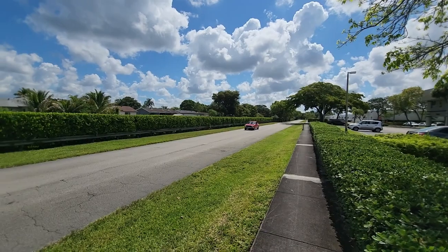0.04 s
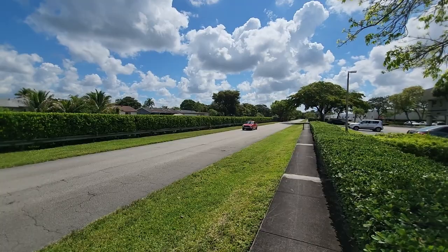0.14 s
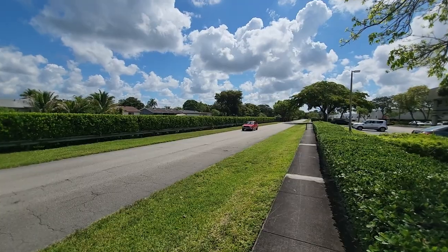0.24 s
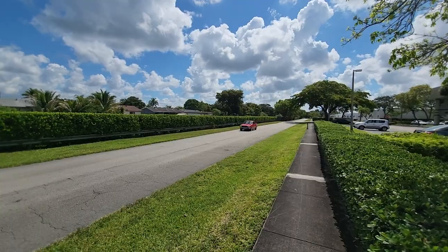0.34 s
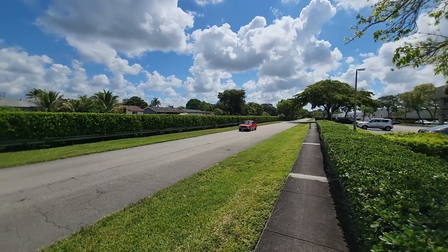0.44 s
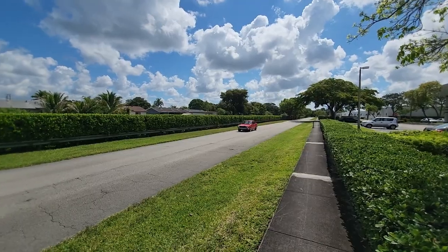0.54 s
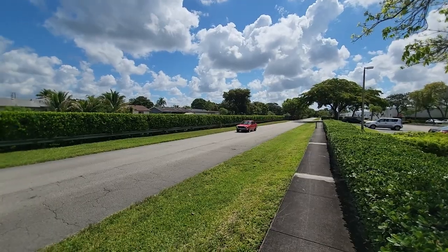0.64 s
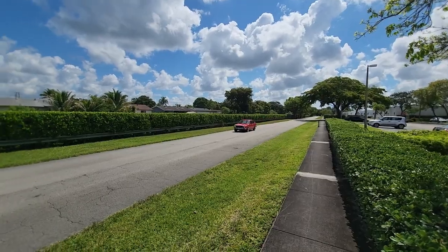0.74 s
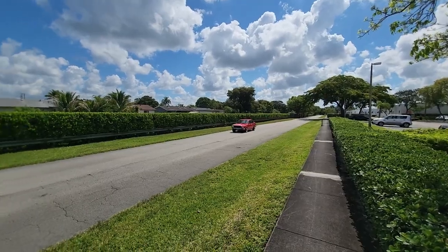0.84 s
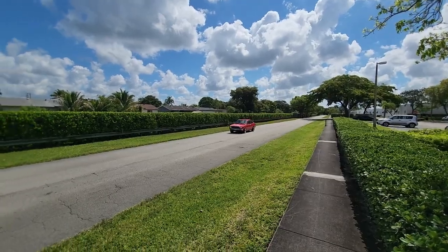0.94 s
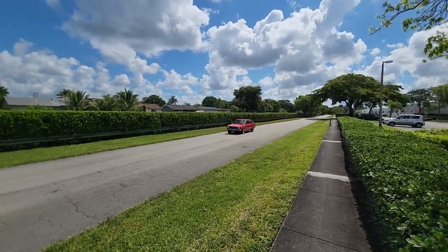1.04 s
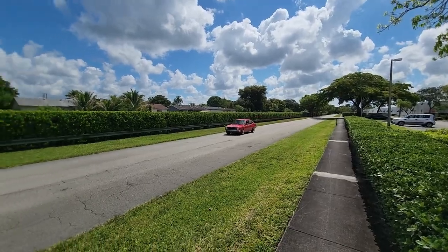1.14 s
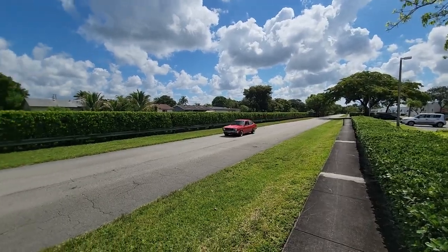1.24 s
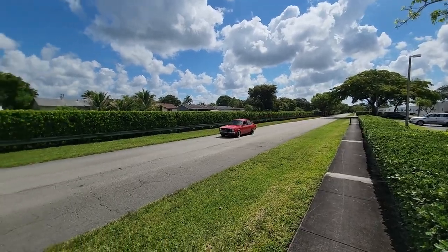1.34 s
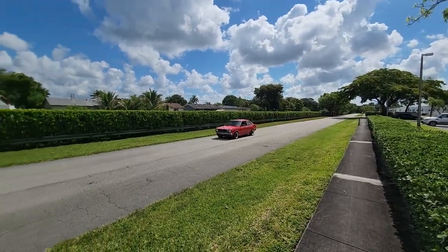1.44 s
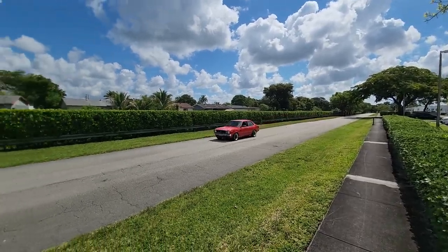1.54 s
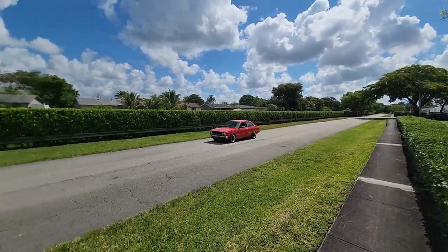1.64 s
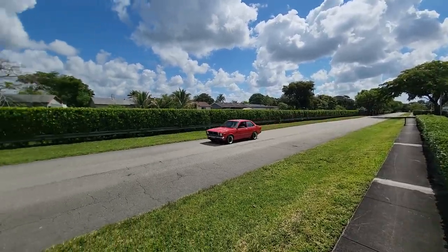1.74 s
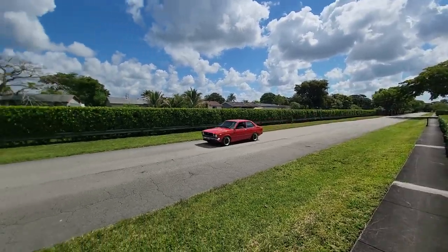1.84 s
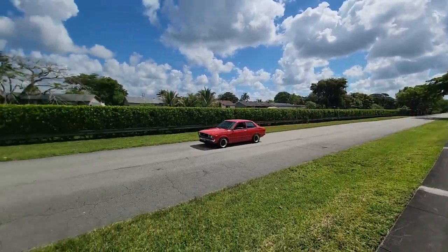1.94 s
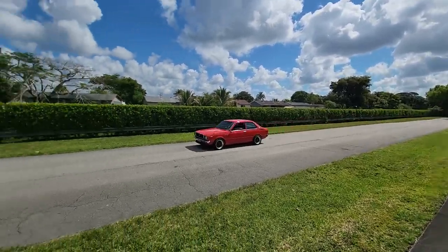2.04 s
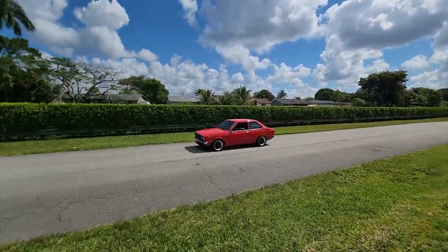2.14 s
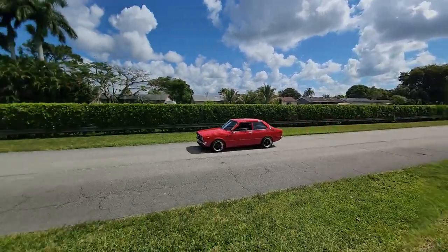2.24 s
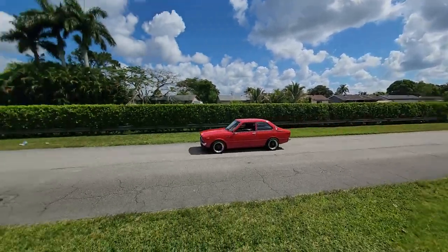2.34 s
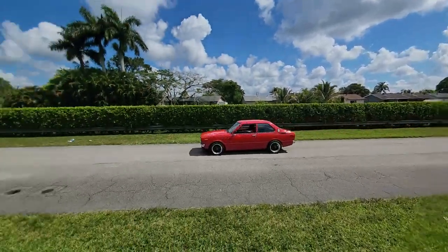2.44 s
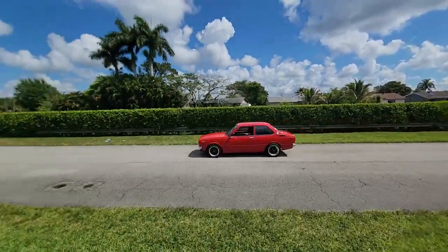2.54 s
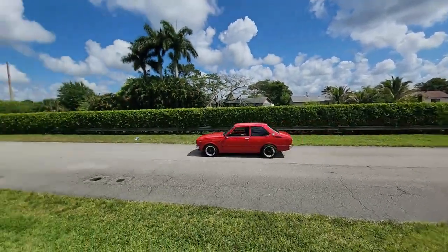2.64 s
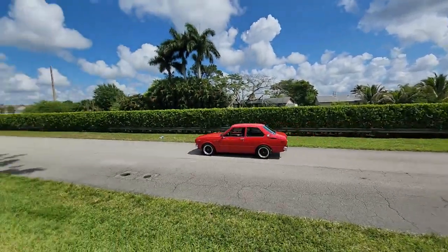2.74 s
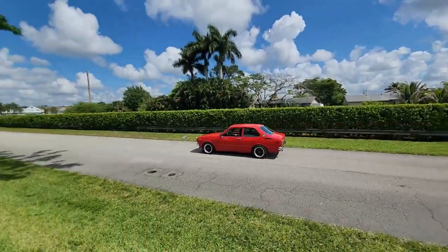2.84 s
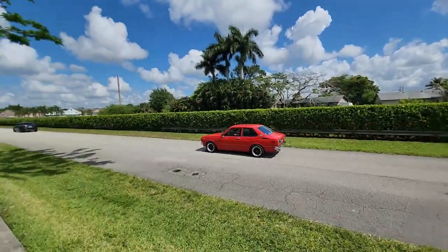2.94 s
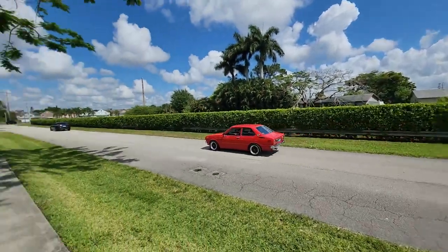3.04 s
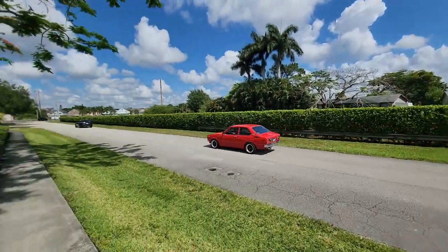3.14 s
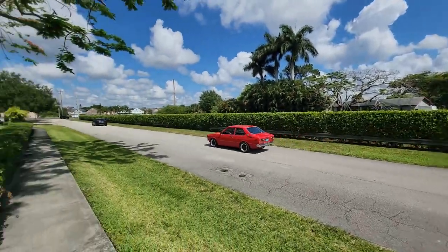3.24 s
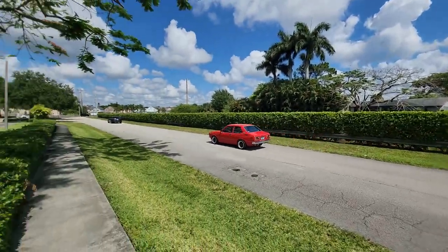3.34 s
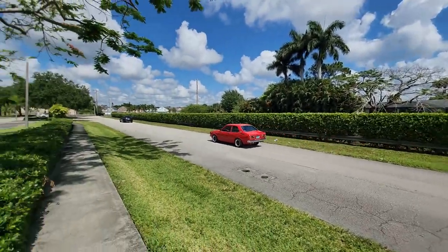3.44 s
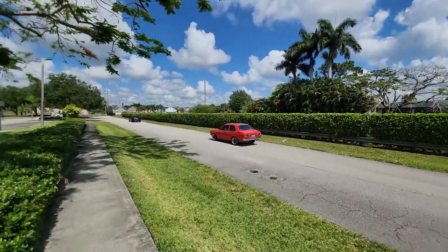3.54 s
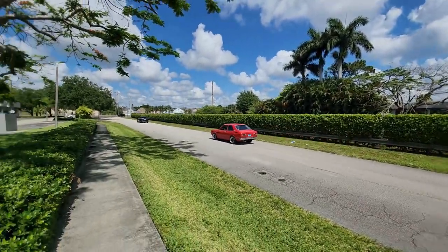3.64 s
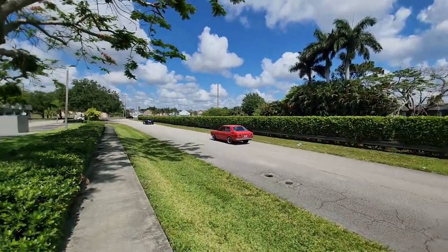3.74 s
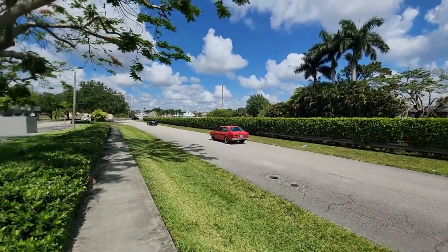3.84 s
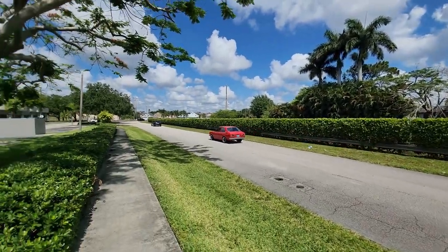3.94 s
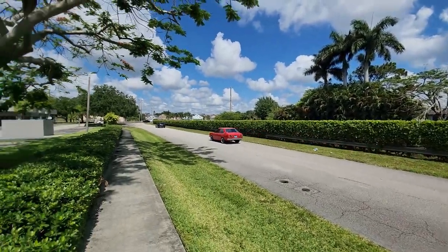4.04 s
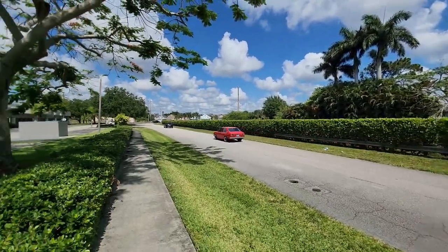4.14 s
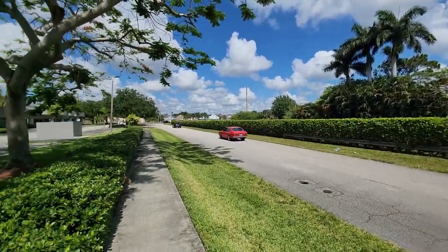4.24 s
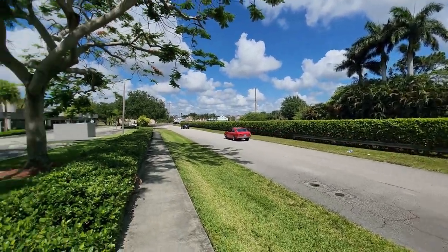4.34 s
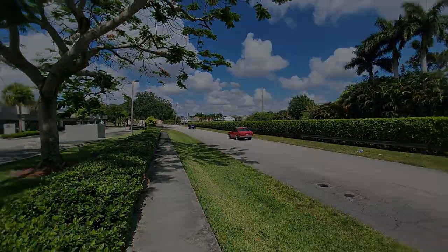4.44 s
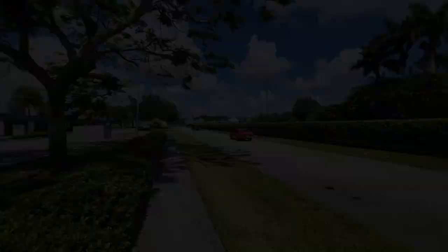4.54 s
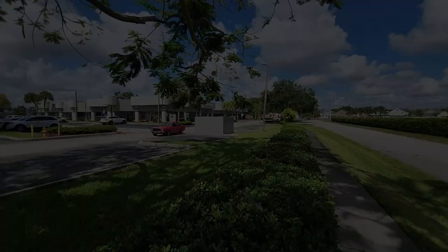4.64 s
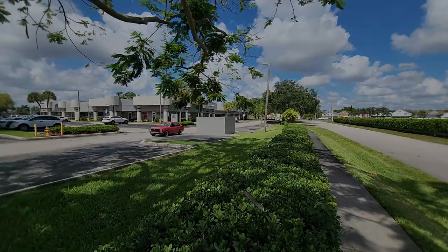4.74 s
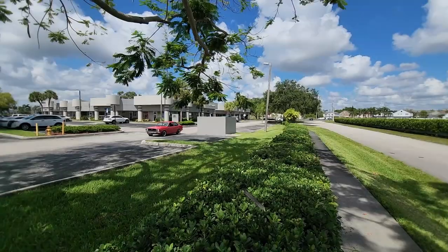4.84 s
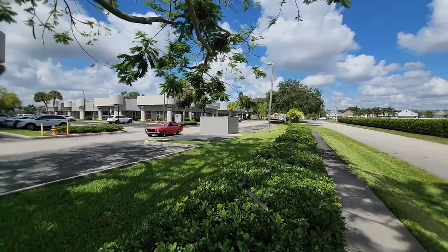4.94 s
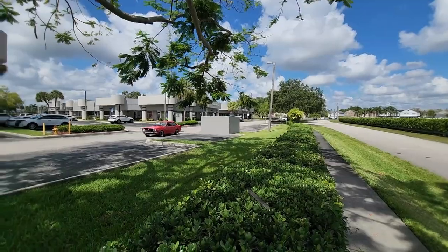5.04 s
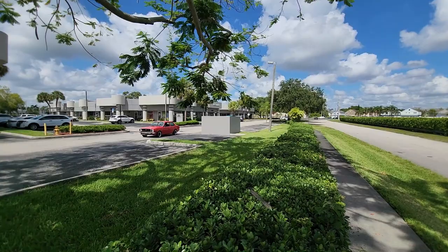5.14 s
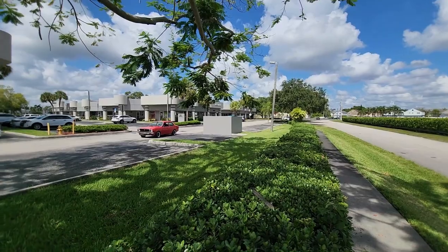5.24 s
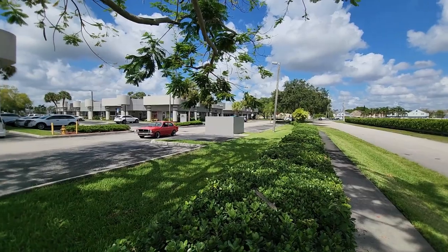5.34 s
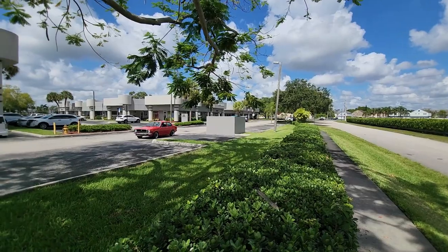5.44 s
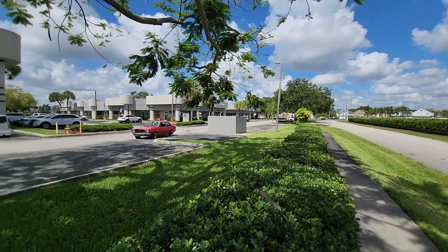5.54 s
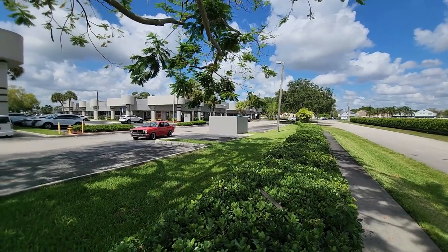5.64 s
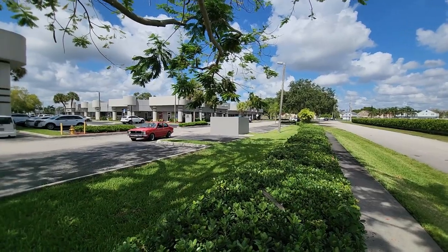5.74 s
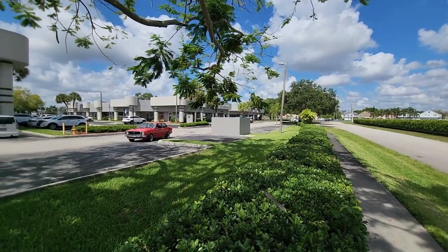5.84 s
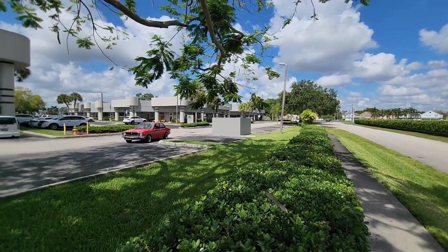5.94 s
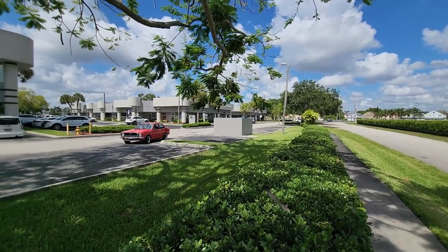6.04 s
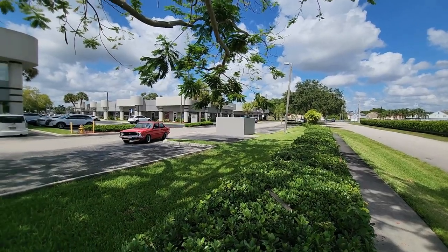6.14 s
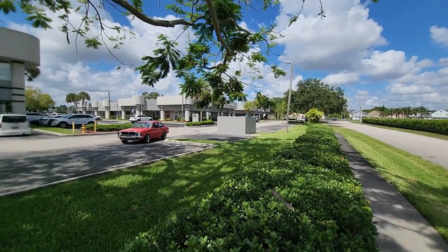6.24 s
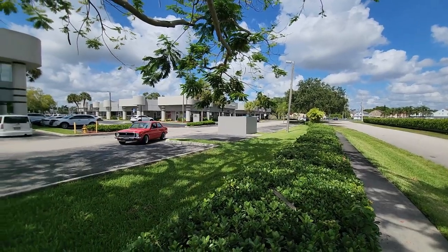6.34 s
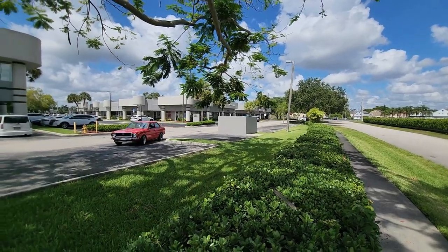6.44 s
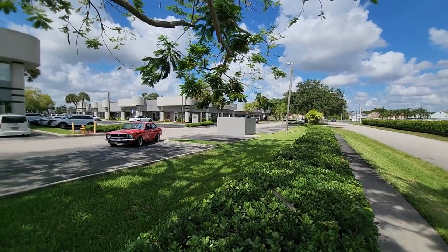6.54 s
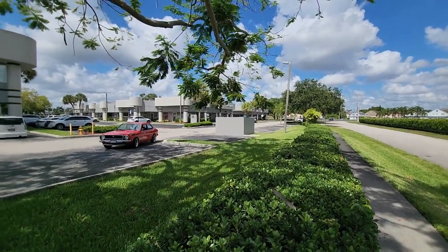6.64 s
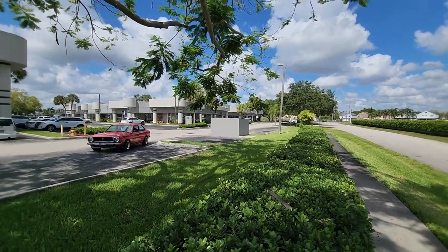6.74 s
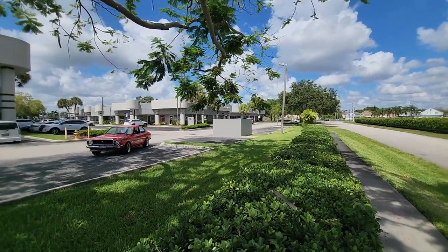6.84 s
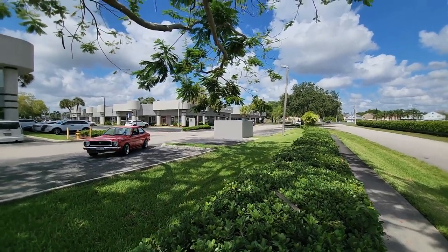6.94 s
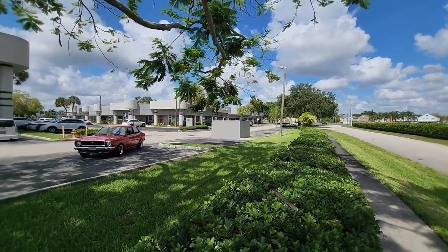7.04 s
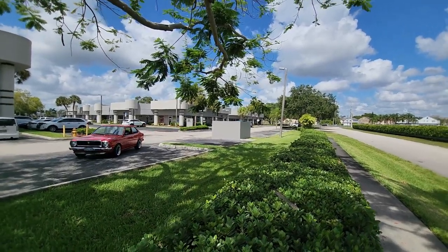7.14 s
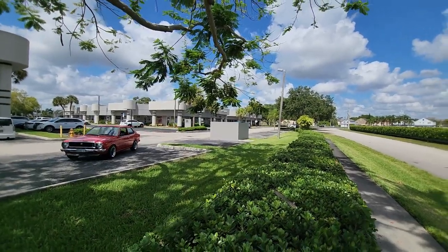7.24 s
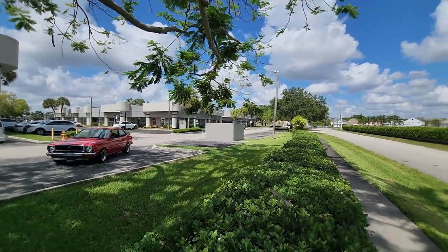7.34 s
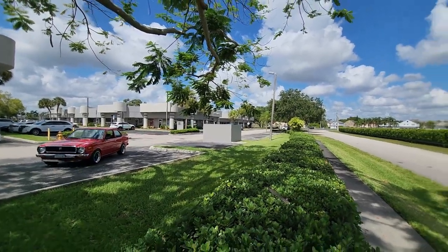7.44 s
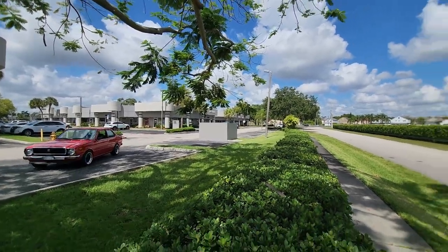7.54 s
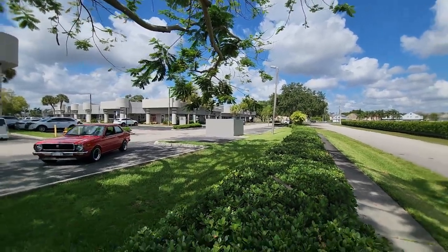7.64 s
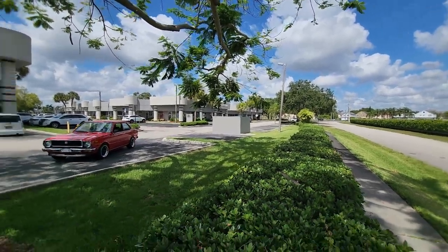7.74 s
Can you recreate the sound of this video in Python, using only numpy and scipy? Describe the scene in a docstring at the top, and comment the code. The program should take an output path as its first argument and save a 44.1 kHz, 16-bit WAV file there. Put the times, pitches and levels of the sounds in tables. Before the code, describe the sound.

An old small car drones past on a suburban road with rushing tyres, cuts out briefly, then creeps closer at a lumpy idle and blips the throttle.

```python
"""Coasting and idling car

An old four-cylinder coupe coasts past on a suburban road, exhaust droning and tyres rushing; after a
short silence it creeps out of a car park at a lumpy idle, and the driver blips the throttle.
Exhaust: tones locked to the firing rate, and pulses and noise ringing pipe resonances. Tyres, intake
and air: coloured noise, much of it throbbing with the firings. Whistle and fan: tones of their own.
Grit: short noise bursts. Distance, turning and Doppler shape the pass; far traffic lies underneath."""
import sys
import numpy as np
from scipy import signal
from scipy.fft import rfft, irfft, next_fast_len
from scipy.io import wavfile
from scipy.ndimage import uniform_filter1d, map_coordinates

SR = 44100
rng = np.random.default_rng(int(sys.argv[2]) if len(sys.argv) > 2 else 0)


def store_pcm(level_fs):
    """Save levels as 16-bit WAV."""
    pcm = np.round(np.clip(level_fs, -1, 1) * 32767).astype(np.int16)
    wavfile.write(sys.argv[1], SR, np.atleast_2d(pcm).T)


N = 342946

# silence between the two scenes: start_s, end_s
SILENCE = (4.598, 4.640)

# strength of the four firings: relative_strength
CYLINDERS = [0.96, 0.59, 1.21, 0.62]
# exhaust pipe resonances, coasting and idling: centre_hz, width_hz, relative_db
PIPE_COAST = [(50.6, 22, -6), (107.6, 25.7, 5), (166.3, 57.7, -2), (216, 84, -10), (284, 21, -15)]
PIPE_IDLE = [(42, 22, -9), (71, 32, 2), (108, 21, 5.5), (167.5, 18, -1), (244, 31, -13), (312, 89, -23.5)]
# brief dips of the boom: centre_s, spread_s, depth_db
BOOM_DIPS = [(.43, .13, 5.5), (.69, 0.13, 14.5), (1.22, .06, 7), (1.47, 0.12, 7.5), (3.75, .05, 5.5),
             (4.36, 0.088, 6)]
# sputters on the closed throttle: centre_s, spread_s, rise_db
SPUTTERS = [(2.15, .14, 4.5), (3.15, 0.11, 2.5)]
# firing rate settling to idle, before its wander and the blip: time_s, firing_hz
IDLE = [(4.65, 50.62), (4.84, 47.62), (5.55, 40.3), (5.82, 40.53), (6.14, 37.25), (6.43, 38.1),
        (6.89, 36.1), (7.45, 36.0)]
# surges of the idle's third order: centre_s, spread_s, rise_db
SURGES = [(5.29, 0.031, 15.5), (5.94, 0.084, 11), (6.44, 0.079, 5.5), (7.03, 0.14, 6)]
# falters of the idle's second order: centre_s, spread_s, depth_db
FALTERS = [(5.12, 0.037, 6), (6.07, 0.07, 19)]
# the blip: time_s, opening (0-1)
THROTTLE = [(7.46, 0.22), (7.6, 0.98), (7.745, 0.11)]
# the blip's bark over its common level: order (multiple of the firing rate), relative_db
BARK = [(4, 3), (5, -1.5), (6, -7), (8, -29), (9, -12.5), (10, -17.5), (11, -12.5), (12, -17.5)]

# Noise spectra, each scaled to rms 1 before its level is set: frequency_hz, relative_db (per Hz)
# resonance of the tailpipe's tip
TAILPIPE_RING = [(700, -42), (1050, -8.5), (1250, 3), (1350, -5.5), (1500, -23), (2200, -63)]
# tread roar of the nearing and of the leaving car
TREAD_FRONT = [(200, -2.5), (330, -8.5), (440, -11), (560, -6.5), (720, -8.5), (940, 0), (1080, -2),
               (1220, -13.5), (1420, -4.5), (1650, -16.5), (1850, -11), (2400, -49), (4000, -100)]
TREAD_REAR = [(200, -49), (340, -10), (450, -6.5), (580, 2.5), (700, -2), (850, -5), (1020, -6), (1250, -5),
              (1420, -12), (1620, -9.5), (1850, -10), (2400, -47), (4000, -100)]
# hiss of tyres and grille from ahead; tyre hiss from behind
HISS_FRONT = [(1880, -25), (3200, -1), (4300, 0), (4760, -5.5), (5480, -4.5), (5940, -7), (7460, -4),
              (8530, -11), (9500, -21), (10700, -18.5), (11900, -14), (15100, -21), (15900, -26.5)]
HISS_REAR = [(1880, -28), (3200, -1.5), (4100, -4), (4480, -6), (5510, -6), (5860, -11.5), (7510, -5),
             (8420, -8.5), (9560, -22), (11600, -18), (12900, -22.5), (15100, -19), (15900, -32)]
# engine whirr through the grille at speed; engine bay whirr at idle
GRILLE_WHIRR = [(1060, -36), (1800, -4.5), (2040, 0.5), (2310, 1.5), (2490, -2), (2690, -3), (3200, -10),
                (4160, -23), (7040, -120)]
BAY_WHIRR = [(350, -18), (650, -3), (820, -7.5), (960, 5), (1150, 0), (1550, -1), (1950, -1.5), (2090, 0.5),
             (2170, 1), (2450, -0.5), (2650, 0), (2900, -6.5), (3600, -11), (4300, -14.5), (5800, -45)]
# carburettor rasp; engine bay air hiss
INTAKE = [(190, -12), (290, -3), (400, -7), (560, -4), (680, -3), (830, -13), (1150, -42), (1400, -12),
          (1700, -33), (2600, -73)]
BAY_AIR = [(2120, -26), (3600, -4.5), (4260, -1), (4790, -6), (5230, -5.5), (6220, -5.5), (6960, -8),
           (8080, -5.5), (9390, -19.5), (11500, -12), (13000, -17.5), (15200, -15), (15900, -27)]
# far town rumble; distant traffic
ROADSIDE = [(25, -28), (70, 5.5), (160, -3.5), (245, 2.5), (300, -11), (420, -18.5), (900, -64)]
TRAFFIC = [(15, -44), (25, -11), (99, -15), (229, -35), (308, -23), (414, -35.5), (957, -34), (1650, -53.5),
           (2500, -42.5), (2830, -43), (9000, -57.5), (11700, -97), (19800, -120)]

# the engine bay's whistle: time_s, pitch_hz, level_db
WHISTLE = [(4.65, 2510, -65), (5.7, 2500, -53.5), (6.4, 2454, -51), (7.1, 2440, -49.5), (7.8, 2458, -46.5)]
# the nearing fan's hum, before its slight wander: time_s, pitch_hz, level_db
FAN = [(4.65, 293.2, -52), (5.4, 299.3, -52), (6.2, 298.7, -46.5), (7.8, 296.6, -45.5)]
# grit under the tyres: start_s, start_level_db, centre_hz, half_width_octaves, t60_s
GRIT = [(3.45, -37, 1300, 0.87, 0.04), (3.555, -42.5, 5000, 0.4, 0.044), (3.856, -41, 4260, 0.28, .04),
        (3.977, -42, 4195, 0.073, 0.083), (4.071, -43, 4300, 0.19, 0.045), (4.227, -42, 4270, 0.12, 0.056),
        (4.411, -47, 3500, 0.64, 0.092), (4.475, -47, 4600, 0.25, 0.055), (6.573, -37, 6500, 0.35, 0.047),
        (6.611, -49, 9050, 0.52, 0.038), (6.748, -38.5, 3880, 0.43, 0.15), (6.758, -33, 690, 0.3, 0.14),
        (6.763, -42, 5003, 0.79, .06), (7.337, -28.5, 2190, 0.21, 0.028)]
# lag of the right channel, before each source's spacing factor: time_s, relative_lag_ms
BEARING = [(0, 0.44), (.7, 0.28), (1.3, 0.19), (2.3, 0.2), (3.2, 0.14), (4.6, 0.17), (4.7, 0.32),
           (7.8, 0.43)]
# likeness of left and right in noise: frequency_hz, correlation (0-1)
ALIKE = [(150, 1), (350, 0.92), (700, 1), (1400, 0.42), (2800, 0.38), (5000, 0.23), (12000, 0.32)]
# left against right microphone: frequency_hz, difference_db
BALANCE = [(100, 1.0), (350, 0.8), (700, 0.7), (1400, -2.5), (2800, -4.0), (5600, 0.2), (12000, 0.0)]

# Passing car, levels at the closest point and losses per doubling of distance:
# front_db, front_loss_db, rear_db, rear_loss_db
BOOM_DB = (-14.5, 2.5, -13.5, 2.5)
OCTAVE_DB = (-20.5, 13.5, -30, 12)
BURBLE_DB = (-19, 11.5, -24.5, 1.5)
TAILPIPE_DB = (-74, -3, -48, -0.5)
ROAR_DB = (-28, 0.32, -34, 7.5)
HISS_DB = (-40.5, 16, -42.5, 9)
DRONE_DB = (-22.5, 12.5, -35.5, 17)
WHIRR_DB = (-41, -0.7, -44, 8)
GRILLE_AIR_DB = (-49, -1.9, -58, 3)

# Creeping car: near_db, added_when_far_db, added_by_full_throttle_db, added_by_full_revs_db
THUD_DB = (-31.5, -4.5, -0.5, 21.5)
SECOND_DB = (-19.5, -11, 7, -13.5)
THIRD_DB = (-30, -10.5, 12.5, -3)
LUMPS_DB = (-29, 1.5, 14, 10)
BARK_DB = (-44.5, -6.5, 16, -1.5)
RASP_DB = (-46, -7.5, 20.5, 3)
BAY_DB = (-42, -6.5, 6.5, 2.5)
AIR_DB = (-46.5, -15, 11, 2.5)

# the pass: moment abreast, speed, distance from the car's lane, time constant of turning its tail
PASS_S, SPEED_M_PER_S, LANE_M, TURN_S = 2.3, 10.1, 9.08, 0.2
SOUND_M_PER_S = 343
# the tread's colour turns sooner and more slowly than its level
COLOUR_LEAD_S, COLOUR_TURN_S = 0.22, 0.3
# coasting, engine and wheels slow down steadily: rates at time zero, before Doppler
FIRING_HZ, FIRING_SAG_HZ_PER_S = 80.78, 3.35
DRONE_HZ, DRONE_SAG_HZ_PER_S = 176.8, 3.7
HALF_ORDER_DB, HALF_ORDER_SWELL = -8.5, 2.4  # over the burble; how much more it swells in a sputter
NEARING_S = 2.24  # time constant of the slow approach
HUNTING = 0.01202  # share by which the idle speed wanders
REV_RISE_HZ = 35.72  # firing rate that the blip adds
THROTTLE_POWER = 0.81  # below 1: the first crack of the throttle adds the most level
SURGE_DRAIN = 0.38  # share of a surge by which the second order falls
# an order swells as it crosses the pipe's strongest resonance
RING_HZ, RING_WIDTH_HZ, RING_DB = 111.4, 11.8, 6.5
TOP_HZ = 15780  # band limit


def coasting_exhaust():
    """Periodic excitation: firings on a closed throttle boom at a sinking rate; uneven ones add a half order."""
    firings = slowing(FIRING_HZ, FIRING_SAG_HZ_PER_S)
    boom = tone(firings, passing_db(BOOM_DB) - swells(BOOM_DIPS), rough_db=0.96)
    octave = tone(2 * firings, passing_db(OCTAVE_DB), rough_db=2.0)
    burble_db, sputter_db = passing_db(BURBLE_DB), swells(SPUTTERS)
    half_db = burble_db + HALF_ORDER_DB + HALF_ORDER_SWELL * sputter_db
    half_order = tone(1.5 * firings, half_db, rough_db=3.0)
    lumps = amp(burble_db + sputter_db) * burble(firings, PIPE_COAST, scatter=1.0, gas=0.89)
    return boom + octave + half_order + lumps, firings


def idling_exhaust():
    """Harmonic series: the pipe favours low orders of the firing rate; throttle adds a bark of higher ones."""
    _, revs = blip()
    firing_hz = curves(IDLE)[0] * (1 + HUNTING * wobble(9)) + REV_RISE_HZ * revs
    firings = np.cumsum(firing_hz) / SR

    def ring_db(hz):
        return RING_DB * np.exp(-((hz - RING_HZ) / RING_WIDTH_HZ) ** 2)

    surge_db = swells(SURGES)
    sag_db = SURGE_DRAIN * surge_db + swells(FALTERS)
    second_db = creeping_db(SECOND_DB) + ring_db(2 * firing_hz) - sag_db
    third_db = creeping_db(THIRD_DB) + ring_db(3 * firing_hz) + surge_db
    thud = tone(firings, creeping_db(THUD_DB), rough_db=-2.5)
    second = tone(2 * firings, second_db, rough_db=3.0)
    third = tone(3 * firings, third_db, rough_db=2.7)
    bark_db = creeping_db(BARK_DB)
    bark = sum(tone(order * firings, bark_db + db, rough_db=3.0) for order, db in BARK)
    # at speed the firings even out and the burble recedes
    lumps_db = creeping_db(LUMPS_DB) - 6 * np.log2(np.maximum(firing_hz / 38, 1))
    lumps = amp(lumps_db) * burble(firings, PIPE_IDLE, scatter=1.0, gas=1.0)
    return thud + second + third + bark + lumps, firings


def burble(firings, pipe, scatter, gas):
    """Resonance: unequal firings and turbulent gas ring the exhaust pipe between the engine's orders."""
    at = np.flatnonzero(np.diff(np.floor(firings)) > 0)
    strength = np.resize(CYLINDERS, len(at)) + scatter * rng.uniform(-1.0, 1, len(at))
    pulses = np.zeros(N)
    pulses[at] = strength - strength.mean()

    def pipe_and_muffler(hz):
        modes = 0
        for k, (centre, width, db) in enumerate(pipe):
            damping = 1j * hz * width
            # neighbouring modes alternate in sign
            modes = modes + (-1) ** k * amp(db) * damping / (centre * centre - hz * hz + damping)
        muffler = 1 / np.sqrt(1 + (hz / 380) ** 8)
        return modes * muffler

    ring = filtered(unit(pulses) + gas * rng.standard_normal(N), pipe_and_muffler)
    # the gas flow evens out over a few cycles
    power = np.abs(uniform_filter1d(ring ** 2, size=SR // 8))
    return ring / np.sqrt(power + 1e-14)


def tailpipe_rasp(firings):
    """Modulated turbulence: each firing pushes a puff of gas through the resonant tip of the pipe."""
    # negative depth: strongest midway between firings
    return amp(passing_db(TAILPIPE_DB)) * rush(TAILPIPE_RING) * throb(firings, depth_db=-1)


def tread_roar(firings):
    """Directivity: broadband tread noise changes colour as the car turns its tail."""
    front = rush(TREAD_FRONT) * throb(firings, depth_db=1.0)
    rear = rush(TREAD_REAR) * throb(firings, depth_db=0.5)
    return amp(passing_db(ROAR_DB) + 0.71 * wobble(11)) * turning(front, rear)


def tyre_hiss(firings):
    """Amplitude modulation: treble noise, ticking once an engine cycle and crackling from behind."""
    # four firings make a cycle
    ticking = throb(firings / 4, depth_db=0.3) * throb(firings, depth_db=1.8)
    rear = rush(HISS_REAR) * ticking * crackle(rate=30, size=.42, t60=0.069)
    return amp(passing_db(HISS_DB) + .3 * wobble(30)) * turning(rush(HISS_FRONT), rear)


def wheel_drone():
    """Doppler effect: a steady tone of the slowing wheels drops in pitch as the car goes by."""
    return tone(slowing(DRONE_HZ, DRONE_SAG_HZ_PER_S), passing_db(DRONE_DB), rough_db=2.0)


def grille():
    """Radiation through an opening: engine whirr and air hiss, as band-shaped noise."""
    whirr = amp(passing_db(WHIRR_DB) + 0.71 * wobble(29.4)) * rush(GRILLE_WHIRR)
    return whirr + amp(passing_db(GRILLE_AIR_DB)) * rush(HISS_FRONT)


def engine_bay(firings):
    """Modulated noise: valve gear and fan whirr; the carburettor rasps and hisses with the throttle."""
    rasp = amp(creeping_db(RASP_DB)) * rush(INTAKE) * throb(firings, depth_db=2)
    whirr = amp(creeping_db(BAY_DB) + 0.83 * wobble(60)) * rush(BAY_WHIRR) * throb(firings, depth_db=0.5)
    air = amp(creeping_db(AIR_DB) + 1.1 * wobble(17)) * rush(BAY_AIR) * throb(firings, depth_db=1.2)
    return rasp + whirr + air


def bay_whistle():
    """Narrow-band noise: a breathy tone whose strength and phase keep changing."""
    pitch_hz, level_db = curves(WHISTLE)
    angle = 2 * np.pi * np.cumsum(pitch_hz) / SR
    breathy = wobble(170) * np.sin(angle) + wobble(170) * np.cos(angle)
    return amp(level_db + 0.57 * wobble(22)) * breathy


def cooling_fan():
    """Independent rotation: an electric fan hums at its own speed, whatever the engine does."""
    pitch_hz, level_db = curves(FAN)
    turns = np.cumsum(pitch_hz + 0.8 * wobble(6)) / SR
    return tone(turns, level_db, rough_db=2)


def grit():
    """Impulsive excitation: stones snap under the tread, each a decaying burst around its own pitch."""
    out, t = np.zeros((2, N + SR)), np.arange(SR // 4) / SR
    hz = np.fft.rfftfreq(len(t), 1 / SR)
    for start_s, db, centre_hz, half_width, t60 in GRIT:
        octaves = np.log2((hz + 1) / centre_hz)
        colour = 1 / np.sqrt(1 + (octaves / half_width) ** 4)
        # one part common to both channels, one part different in each
        noise = rng.standard_normal(len(t)) + 1.3 * rng.standard_normal((2, len(t)))
        burst = unit(irfft(rfft(noise) * colour, len(t)))
        start = round(start_s * SR)
        out[:, start:start + len(t)] += amp(db - 60 * t / t60) * burst
    return out[:, :N]


def crackle(rate, size, t60):
    """Random impulses: a gain of rms 1 with sudden spikes, fine sand popping in the tread."""
    pops = (rng.random(N) < rate / SR) * rng.exponential(1, N)
    decay = amp(-60 * np.arange(SR // 10) / SR / t60)
    return unit(1 + size * signal.fftconvolve(np.minimum(pops, 3), decay)[:N])


def distant_traffic(first_scene):
    """Superposition of many far sources: steady dark noise, with town rumble in the first scene only."""
    return first_scene * amp(-34.5) * rush(ROADSIDE) + amp(-39.5) * rush(TRAFFIC)


def pass_by():
    """Kinematics of a straight pass: doublings of distance, share of tail facing us (0-1), Doppler factor."""
    since = np.arange(N) / SR - PASS_S
    distance = np.hypot(SPEED_M_PER_S * since, LANE_M)
    receding = SPEED_M_PER_S ** 2 * since / distance
    behind = (1 + np.tanh(since / TURN_S)) / 2
    return np.log2(distance / LANE_M), behind, 1 / (1 + receding / SOUND_M_PER_S)


def passing_db(levels):
    """Spreading and directivity: level follows distance and turns from its front to its rear value."""
    front, front_loss, rear, rear_loss = levels
    doublings, behind, _ = pass_by()
    return (1 - behind) * (front - front_loss * doublings) + behind * (rear - rear_loss * doublings)


def turning(front, rear):
    """Equal-power mixing of front and rear colours as the car turns its tail."""
    since = np.arange(N) / SR - PASS_S + COLOUR_LEAD_S
    behind = (1 + np.tanh(since / COLOUR_TURN_S)) / 2
    return np.sqrt(1 - behind) * front + np.sqrt(behind) * rear


def slowing(start_hz, sag):
    """Phase as the integral of rate: turns on the passing car, sinking by sag Hz a second, with Doppler."""
    _, _, doppler = pass_by()
    return np.cumsum((start_hz - sag * np.arange(N) / SR) * doppler) / SR


def blip():
    """Inertia: revs (0-1) integrate the throttle opening, for the engine gathers speed while it is open."""
    throttle = np.clip(curves(THROTTLE)[0], 0, None) * (np.arange(N) / SR > THROTTLE[0][0])
    return throttle, np.cumsum(throttle) / throttle.sum()


def creeping_db(levels):
    """Approach and load: level changes as the car nears, and follows throttle and revs."""
    near, when_far, by_throttle, by_revs = levels
    far = np.exp(-np.maximum(np.arange(N) / SR - SILENCE[1], 0) / NEARING_S)
    throttle, revs = blip()
    return near + when_far * far + by_throttle * throttle ** THROTTLE_POWER + by_revs * revs


def heard(sound, spacing):
    """Interaural-type delay: sound reaches the right microphone later, by the car's bearing."""
    left, right = np.broadcast_to(sound, (2, N))
    lag = spacing * curves(BEARING)[0] * SR / 1000
    return np.array([left, map_coordinates(right, [np.arange(N) - lag])])


def tone(turns, db, rough_db):
    """Sinusoid with amplitude flutter: a line at about the given rms level."""
    return amp(db + rough_db * wobble(28)) * np.sqrt(2) * np.sin(2 * np.pi * turns)


def throb(turns, depth_db):
    """Periodic modulation: a gain of rms 1 that swings once a turn."""
    return unit(amp(depth_db * np.cos(2 * np.pi * turns)))


def rush(spectrum):
    """Partial coherence: stereo noise of rms 1, alike in the bass and diffuse in the treble."""
    def mid_side(hz):
        # the cosine of twice this angle is the left-right correlation
        angle = np.arccos(np.clip(along(ALIKE, hz), -1, 1)) / 2
        return amp(along(spectrum, hz)) * [np.cos(angle), np.sin(angle)]

    mid, side = filtered(rng.standard_normal((2, N)), mid_side)
    return unit(np.array([mid + side, mid - side]))


def swells(rows):
    """Gaussian envelopes: smooth bumps in dB from (centre_s, spread_s, height_db) rows."""
    t = np.arange(N) / SR
    return sum(db * np.exp(-((t - centre) / spread) ** 2) for centre, spread, db in rows)


def wobble(rate):
    """Band-limited fluctuation: a smooth random curve, rate knots a second."""
    knots = rng.standard_normal(int(N * rate / SR) + 4)
    return map_coordinates(knots, [np.arange(N) * rate / SR])


def curves(rows):
    """Linear interpolation in time: one value per sample for each column after the time."""
    s, *cols = np.transpose(rows)
    return [np.interp(np.arange(N) / SR, s, c) for c in cols]


def along(points, hz):
    """Logarithmic frequency scale: (frequency_hz, value) points read on a log axis."""
    f, v = np.transpose(points)
    return np.interp(np.log(hz + 1), np.log(f + 1), v)


def filtered(x, response):
    """Linear filtering: the spectrum of x times a response of frequency."""
    size = next_fast_len(N + SR // 2)
    return irfft(rfft(x, size) * response(np.fft.rfftfreq(size, 1 / SR)), size)[..., :N]


def unit(x):
    """Normalisation: scale to rms 1."""
    return x / np.sqrt(np.mean(x ** 2) + 1e-20)


def amp(db):
    """Logarithmic level: decibels to gain."""
    return 10 ** (np.asarray(db) / 20)


def scene():
    """Superposition of sources: the pass, a short silence, then the creeping car."""
    t = np.arange(N) / SR
    first_scene = t < SILENCE[0]
    coasting, fast_firings = coasting_exhaust()
    idling, slow_firings = idling_exhaust()
    exhaust = heard(np.where(first_scene, coasting, idling + cooling_fan()), spacing=0.45)
    rolling = tread_roar(fast_firings) + tyre_hiss(fast_firings) + wheel_drone()
    passing = rolling + grille() + tailpipe_rasp(fast_firings)
    creeping = engine_bay(slow_firings) + bay_whistle()
    running = heard(np.where(first_scene, passing, creeping) + grit(), spacing=1.065)
    # 1 ms ramps into and out of the silence
    fade = np.clip(np.maximum(SILENCE[0] - t, t - SILENCE[1]) / .001, 0, 1)
    return (exhaust + running + distant_traffic(first_scene)) * fade


def record(dry):
    """Frequency response: two microphones differ a little in colour; nothing passes the band limit."""
    def microphones(hz):
        # half the difference to each side
        return amp(np.outer([.5, -.5], along(BALANCE, hz))) * (hz < TOP_HZ)

    return filtered(dry, microphones)


dry = scene()
out = record(dry)
store_pcm(out)
```